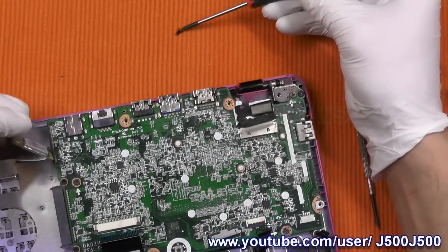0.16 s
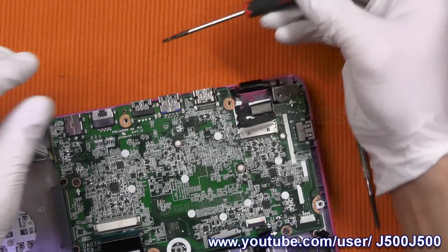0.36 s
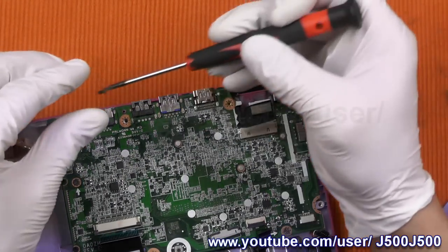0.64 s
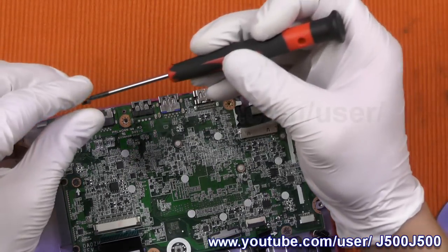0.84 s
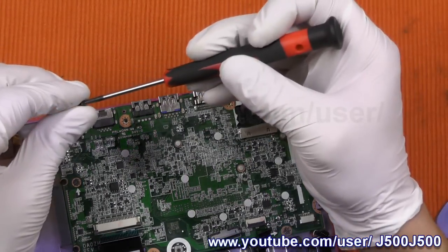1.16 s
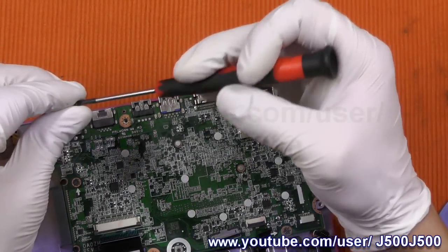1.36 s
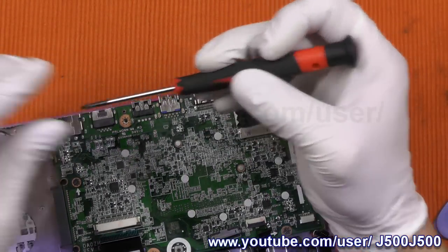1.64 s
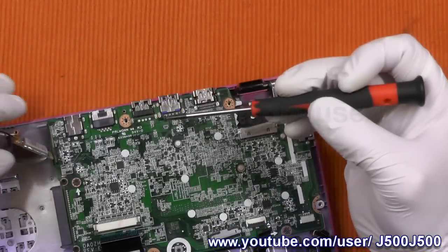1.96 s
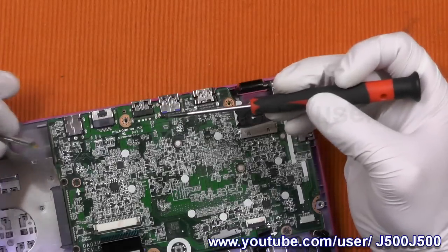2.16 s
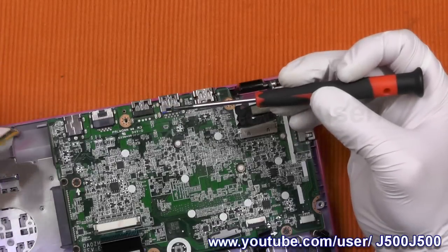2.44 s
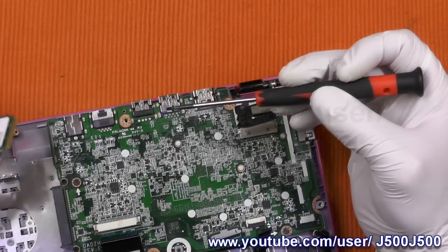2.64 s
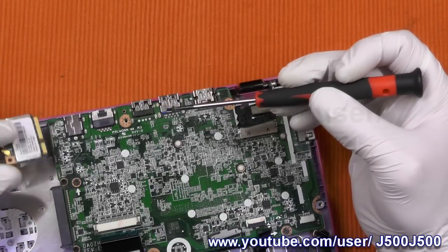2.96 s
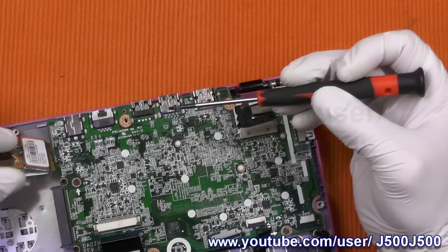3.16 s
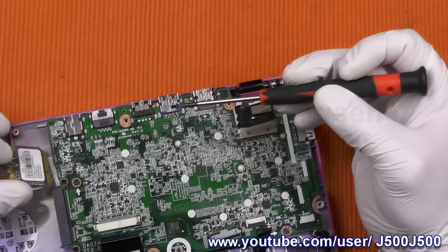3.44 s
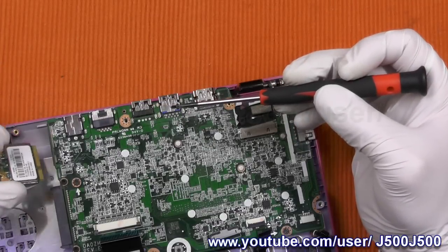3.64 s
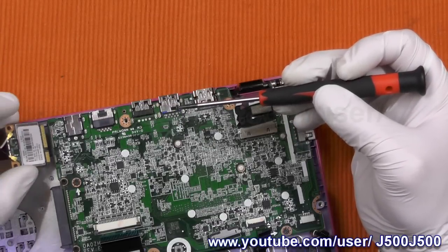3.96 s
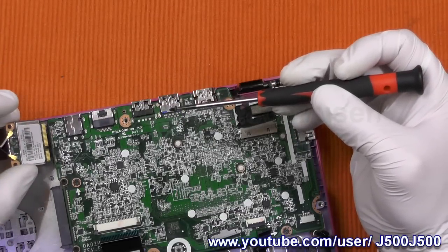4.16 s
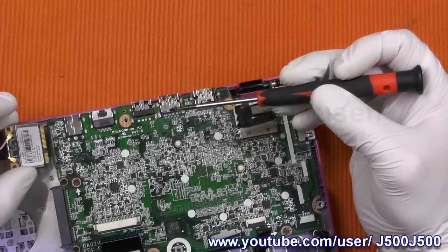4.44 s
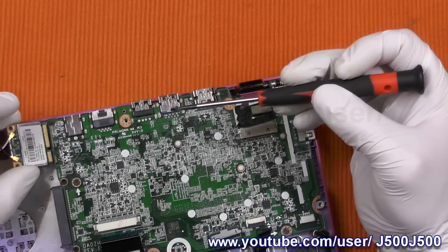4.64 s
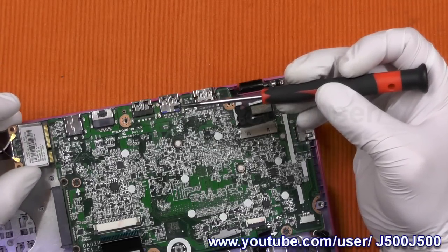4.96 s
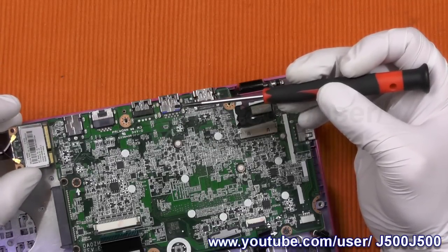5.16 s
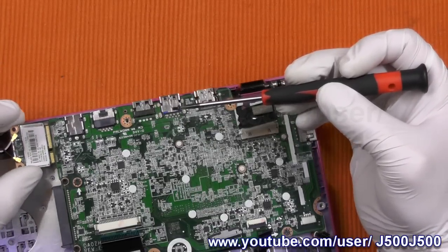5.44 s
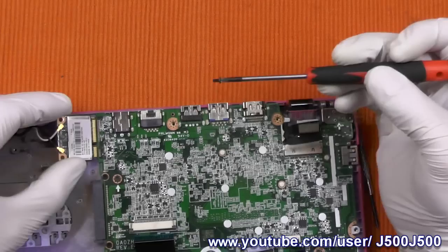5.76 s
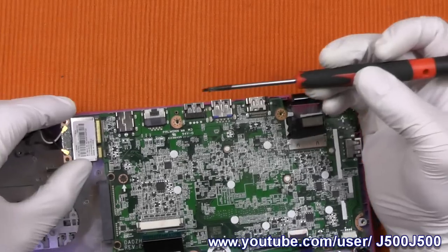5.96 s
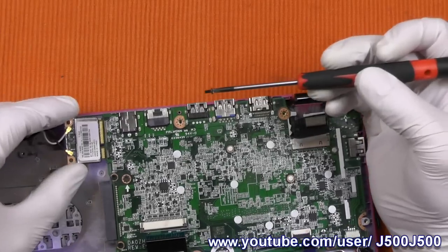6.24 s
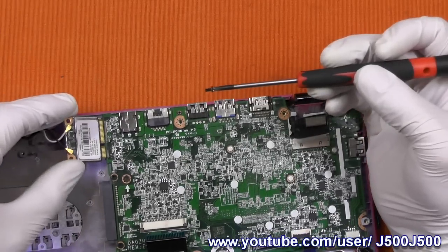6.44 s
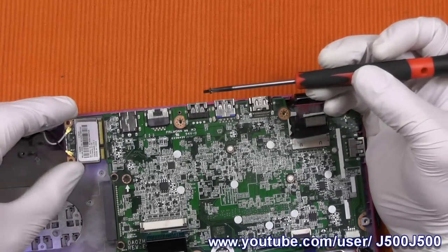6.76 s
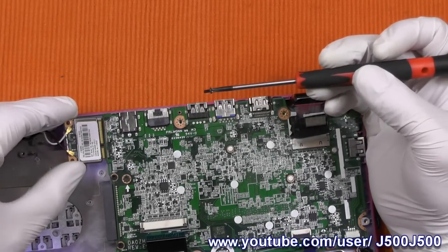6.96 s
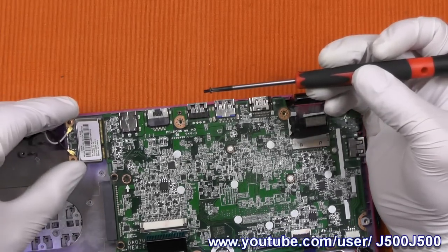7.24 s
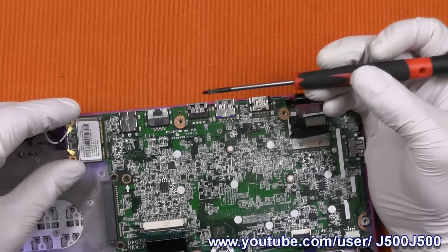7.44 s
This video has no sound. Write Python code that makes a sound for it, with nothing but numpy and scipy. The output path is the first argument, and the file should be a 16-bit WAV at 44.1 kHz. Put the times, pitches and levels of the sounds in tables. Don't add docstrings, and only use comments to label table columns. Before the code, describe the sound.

Close handling of electronics: dry clicks, thin steel ticks, soft rubs over a ribbed mat, and a loud plastic snap midway over faint hiss.

```python
import sys
import numpy as np
from scipy import signal
from scipy.fft import rfft, irfft
from scipy.io import wavfile

SR = 44100
rng = np.random.default_rng(int(sys.argv[2]) if len(sys.argv) > 2 else 0)


def undo_db(level):
    steps = np.asarray(level, float) / 20
    return 10 ** steps


def to_wav(s):
    ch = np.atleast_2d(s).T
    pcm = np.round(np.clip(ch, -1, 1) * 32767)
    wavfile.write(sys.argv[1], SR, pcm.astype(np.int16))


N = 335601


def rms_one(x):
    return x / np.sqrt(np.mean(x ** 2) + 1e-20)


def peak_one(x):
    return x / np.max(np.abs(x))


def band(x, low_hz, high_hz, order):
    return signal.sosfilt(signal.butter(order, [low_hz, high_hz], "band", fs=SR, output="sos"), x)


def on_log_pitch(hz, curve):
    curve_hz, values = np.transpose(curve)
    return np.interp(np.log(hz), np.log(curve_hz), values)


def coloured(x, spectrum):
    size = x.shape[-1]
    hz = np.fft.rfftfreq(size, 1 / SR) + 1
    return rms_one(irfft(rfft(x) * undo_db(on_log_pitch(hz, spectrum)), size))


def drift(rate_hz):
    r = np.exp(-80 * np.pi * rate_hz / SR)
    settle = 2000
    white = rng.standard_normal(N // 40 + settle + 2)
    slow = signal.lfilter([1], [1, -2 * r, r * r], white)[settle:]
    return np.interp(np.arange(N) / 40, np.arange(len(slow)), rms_one(slow))


def swells(rows, edge_db):
    out, s = np.zeros(N), np.arange(N) / SR
    for start, rise, hold, fall, db in rows:
        corners = start + np.cumsum(np.abs([0, rise, hold, fall]))
        from_ends = np.minimum(s - corners[0], corners[-1] - s)
        contact = np.clip(from_ends / .006, 0, 1)
        out += contact * undo_db(db - edge_db * np.interp(s, corners, [1, 0, 0, 1]))
    return out


def ring(clicks, hz, t60):
    r, w = undo_db(-60 / (t60 * SR)), 2 * np.pi * hz / SR
    return signal.lfilter([0, np.sin(w)], [1, -2 * r * np.cos(w), r * r], clicks + 1e-18)


# (f/Hz, likeness/1)
LIKENESS = [(30, 0.38), (90, 1), (180, 0.13), (380, 0.77), (950, 0.58), (1500, 0.995), (2400, 0.9945),
            (3500, 1)]


def stereo_white():
    hz = np.fft.rfftfreq(N, 1 / SR) + 1
    alike = np.clip(on_log_pitch(hz, LIKENESS), -1, 1)
    mid, side = rfft(rng.standard_normal((2, N)))
    return irfft(np.sqrt(1 + alike) * mid + np.sqrt(1 - alike) * side * [[1], [-1]], N)


# (t/s, level/dB at the height of the lean)
LEANS = [
    (0.0, -72.5),
    (0.68, -72.5),
    (2.138, -60.5),
    (3.4, -57.5),
    (4.2, -72),
    (5.5, -65),
    (6.21, -60),
    (6.7, -62),
    (7.25, -66),
]


def rumble():
    rest_db, rise_s, fall_s = -73, 0.29, 0.285
    lumps_db = 1.8 * drift(9)
    colour = [(15, -12.5), (40, -10.0), (70, -5.5), (100, -3.0), (140, -7.5), (220, -15.5), (400, -54.0)]
    low = coloured(stereo_white(), colour)
    leans = swells([(s - rise_s, rise_s, 0, fall_s, db) for s, db in LEANS], edge_db=18.0)
    return (undo_db(rest_db) + 0.408 * leans) * undo_db(lumps_db + 2.0) * low


# (start t/s, rise/s, hold/s, fall/s, level/dB)
BLADE_SPELLS = [
    (-0.2, 0.18, .45, .3, -80),
    (1.0, 0.28, 1.7, .45, -74),
    (5.55, .3, 1.8, .2, -72),
]
# (f/Hz, width/Hz, level/dB)
WHISTLES = [(1092.3, 100, -86), (2629, 45, -87), (3400, 110, -82.5), (3651, 120, -80), (3596, 700, -82)]


def fan():
    blade = undo_db(-90.5) + 0.64 * swells(BLADE_SPELLS, edge_db=7.0)
    white = stereo_white()

    def whistle(hz, width_hz):
        return rms_one(band(white, hz - width_hz / 2, hz + width_hz / 2, order=2))

    out = blade * whistle(1885, 75)
    out += blade * undo_db(-9) * whistle(2620, 97)
    for hz, width_hz, db in WHISTLES:
        out += undo_db(db + drift(0.5)) * whistle(hz, width_hz)
    return out


# (t/s, level/dB)
AIR = [
    (0.0, -64.5),
    (0.7, -65),
    (1.1, -69.5),
    (2.0, -64),
    (3.4, -65.5),
    (4.7, -70.5),
    (6.1, -64),
    (7.61, -68.5),
]
# (f/Hz, level/dB per Hz)
AIR_COLOUR = [(90, -41), (150, -4), (200, -5), (330, -4), (650, -7.5), (850, -16.5), (1200, -9),
              (1700, -10.5), (2300, -19), (3000, -12), (4200, -15.5), (6000, -19.5), (9000, -25),
              (12000, -56)]
# (f/Hz, level/dB per Hz)
HISS = [(4710, -22), (8000, -18.5), (8860, -8), (9630, 3.5), (11500, 2), (12500, 3.5), (15100, 2),
        (15800, -1.5)]


def air():
    air_s, level_db = np.transpose(AIR)
    air_db = np.interp(np.arange(N) / SR, air_s, level_db)
    room_air = undo_db(air_db + 2.0 + 0.54 * drift(9.6)) * coloured(stereo_white(), AIR_COLOUR)
    hiss = undo_db(-68.5) * coloured(stereo_white(), HISS)
    return room_air + fan() + hiss


# (start t/s, rise/s, hold/s, fall/s, level/dB of the rub)
STROKES = [(0.0, 0.009, 0.052, .02, -64), (0.125, 0.0318, .001, .002, -41.5),
           (0.29, 0.0706, 0.065, 0.245, -50), (1.38, 0.0081, 0.276, 0.021, -61.5),
           (1.68, 0.0407, 0.197, 0.128, -47.5), (2.24, 0.011, 0.137, 0.0098, -60.5),
           (2.75, 0.135, 0.0092, 0.078, -57.5), (3.245, .002, .01, 0.116, -48.5),
           (3.33, 0.0462, 0.011, 0.042, -54.5), (3.48, 0.0347, 0.137, 0.034, -56.5),
           (3.69, .002, .03, 0.154, -56.5), (5.32, 0.034, 0.021, 0.127, -56.5),
           (5.54, 0.0934, 0.2416, 0.0633, -45.5), (5.95, 0.0321, 0.1493, 0.0305, -48),
           (6.585, .002, .006, 0.026, -52.5), (6.64, 0.0051, 0.0052, 0.044, -47)]
# (f/Hz, level/dB per Hz)
RUB = [(1060, -36.5), (1800, -52.5), (2300, -12.5), (3310, -5.5), (5030, -6), (8590, -15.5), (9940, -15),
       (14300, -18.5), (15800, -28)]
# (f/Hz, level/dB per Hz)
SCUFF = [(500, -17.5), (800, -10.5), (1400, -6), (2000, -7), (2800, -32.5)]


def slides():
    unevenness_db = 4.0 * rng.standard_normal((2, N)) + 1.2 * drift(79)
    grains = rng.standard_normal((2, N)) * undo_db(unevenness_db)
    rub, scuff = coloured(grains[0], RUB), coloured(grains[1], SCUFF)
    return swells(STROKES, edge_db=17.5) * undo_db(-6.5) * (rub + undo_db(-9.5) * scuff)


# (f/Hz, level/dB, t60/s)
CASE = [(285, -9, .045), (480, -26, .025), (690, 0, .03), (940, -4, .025), (1090, -6, .025),
        (1290, -3, .025)]


def case_rung(contacts, luck_db):
    boom = sum(undo_db(g + r) * ring(contacts, hz, t60) for (hz, g, t60), r in zip(CASE, luck_db))
    return band(boom, 198, 1620, order=2)


def modes_rung(contacts, modes, hz, focus_db, luck_db):
    body = 0
    for (mode_hz, width_hz, g), r in zip(modes, luck_db):
        far_db = focus_db * np.log2(mode_hz / hz) ** 2
        height = undo_db(g + r - far_db) * width_hz
        body = body + height * ring(contacts, mode_hz, .85 / width_hz)
    spot = undo_db(36.5) * ring(contacts, hz, 40.2 / hz)
    return band(body + spot, 1350, 15000, order=3)


def taps(events, modes, boom_db, boom_loss, crack_db, crack_loss, focus_db, crack_low_hz, crack_top_hz, floor=0):
    light_tap_db = -45
    out, size = np.zeros(N + SR), SR // 5
    t = np.arange(size) / SR
    for s, db, hz, t60 in events:
        stronger_db = db - light_tap_db
        build_up = (1 - np.exp(-t / (.09 * t60))) ** 2
        shape = undo_db(-60 * t / t60) * build_up
        contacts = shape * rng.standard_normal(size) * undo_db(5.76 * rng.standard_normal(size))
        luck_db = rng.normal(0, 3, len(modes) + len(CASE))
        tick = modes_rung(contacts, modes, hz, focus_db, luck_db)
        if floor:
            tick = band(tick, floor * hz, 18000, order=2)
        crack = band(contacts * undo_db(-30 * t / t60), crack_low_hz, crack_top_hz, order=2)
        boom = case_rung(contacts, luck_db[::-1])
        layers = peak_one(tick)
        layers = layers + undo_db(crack_db - crack_loss * stronger_db) * peak_one(crack)
        layers = layers + undo_db(boom_db - boom_loss * stronger_db) * peak_one(boom)
        at = round((s - .05 * t60) * SR)
        out[at:at + size] += undo_db(db) * layers
    return out[:N]


# (t/s, peak level/dB, brightest f/Hz, rattle t60/s)
BOARD_TAPS = [(0.092, -43, 4020, 0.06), (1.3452, -46, 1670, 0.0244), (2.612, -34, 1477, 0.01577),
              (3.4688, -33.5, 3160, 0.015), (3.5118, -42.5, 3010, 0.0454), (3.5752, -44.5, 2950, 0.044),
              (3.611, -49.5, 3840, 0.04), (3.859, -52.5, 2670, 0.048), (3.8988, -55, 2730, 0.0206),
              (5.3366, -64.5, 5225, 0.066), (5.445, -48.5, 4320, 0.0222), (5.484, -51, 1450, 0.0175),
              (6.7855, -52.5, 3480, 0.055), (7.0658, -52.5, 3100, 0.029), (7.379, -50.5, 4000, 0.051),
              (7.595, -44.5, 4660, 0.0435)]
# (f/Hz, width/Hz, level/dB)
BOARD = [(1535, 60, -1), (1660, 50, -5), (1765, 50, -4), (2370, 45, -6), (2560, 75, -3), (3055, 60, 1),
         (3350, 70, -3), (3700, 70, -7), (3935, 80, -3), (4300, 70, -6), (4610, 50, 0), (4930, 65, -4),
         (5600, 110, -11), (6100, 90, -11), (6740, 60, -7), (7200, 70, -7), (7540, 60, -3), (8100, 60, -9)]


def board_taps():
    return taps(BOARD_TAPS, BOARD, boom_db=-40, boom_loss=-1.5, crack_db=-4.5, crack_loss=0.5,
                focus_db=0.0, crack_low_hz=7100, crack_top_hz=13450)


# (t/s, peak level/dB, f/Hz, chatter/s)
PINGS = [(0.094, -48.5, 3003, 0.0113), (0.134, -50, 3000, 0.017), (0.1525, -26, 4072, 0.00465),
         (0.198, -49, 714, 0.0122), (3.417, -44, 1408, 0.0091), (3.439, -45, 3060, 0.0118),
         (3.4697, -38.5, 2956, 0.00445), (3.469, -40, 4100, 0.0045), (3.51, -47, 4110, 0.0154),
         (3.512, -48, 3000, .03), (3.576, -47.5, 2980, 0.0092), (3.578, -50.5, 6500, .012),
         (3.612, -54, 3850, 0.0142), (6.586, -49.5, 3010, 0.025), (6.589, -54, 4570, 0.0257),
         (6.645, -44, 2910, 0.0056), (6.652, -53.5, 4590, 0.021), (6.655, -49, 2970, 0.0264),
         (0.53, -52, 288.8, 0.0084), (2.0974, -52.5, 4300, 0.0058), (2.202, -50, 3000, 0.0081),
         (2.205, -46.5, 10400, .008), (2.2895, -40, 7300, 0.00347), (2.2895, -46.5, 9500, 0.0031),
         (2.326, -47.5, 5600, .006), (2.339, -45, 5500, 0.0053), (2.371, -50, 5020, 0.0125),
         (2.389, -48, 5210, 0.0032), (2.395, -51, 5700, .008), (6.02, -44, 3000, 0.0058),
         (6.0753, -39, 4180, 0.0046), (6.075, -48, 1510, 0.0045), (6.123, -45.5, 1520, 0.00985),
         (6.275, -37.5, 6880, 0.0063), (6.274, -34.5, 4600, 0.0062), (3.226, -21, 1610, 0.00485),
         (3.226, -24, 6060, 0.0055), (3.256, -46, 3100, 0.0072), (3.284, -38, 782, 0.0098),
         (3.301, -49.5, 6600, 0.0039), (2.6134, -32, 5990, 0.007), (2.623, -40, 6230, 0.0083),
         (2.6135, -32.5, 12660, 0.0041), (2.582, -53.5, 3700, 0.00335), (3.73, -28.5, 6950, 0.0032),
         (3.6796, -30, 4390, 0.0034), (3.677, -22.5, 8210, 0.003), (3.686, -45.5, 4390, 0.0165),
         (3.729, -37, 3450, 0.0103), (0.2207, -47.5, 8640, 0.0039)]


def pings():
    out, size = np.zeros(N + SR), SR // 10
    t = np.arange(size) / SR
    for s, db, hz, chatter_s in PINGS:
        burst = np.sin(np.pi * np.clip(t / chatter_s, 0, 1)) ** .5
        contacts = rng.standard_normal(size) * burst
        at = round(s * SR)
        out[at:at + size] += undo_db(db) * peak_one(ring(contacts, hz, 34.6 / hz))
    return out[:N]


# (t/s, peak level/dB)
THUDS = [(0.147, -45.5), (0.522, -39), (1.743, -48), (2.168, -44.5), (2.62, -56.5), (2.97, -60.5),
         (3.23, -36.5), (4.13, -58.5), (4.92, -56), (5.021, -57), (5.279, -56), (5.365, -53), (6.021, -59),
         (6.175, -43.5), (6.654, -53), (6.819, -56), (6.868, -46.5), (7.063, -47.5), (7.291, -53.5)]
# (f/Hz, level/dB, t60/s)
TABLE = [(62, -19.5, 0.18), (93.63, -4, 0.306), (133.54, 0.5, 0.1), (200, -9, 0.11)]


def thuds():
    s, db = np.transpose(THUDS)
    out, at = np.zeros(N), (s * SR).round().astype(int)
    for hz, level_db, t60 in TABLE:
        pushes = np.zeros(N)
        luck_db = rng.normal(0, 2, len(at))
        pushes[at] = undo_db(db + level_db + 3.0 + luck_db)
        out += ring(pushes, hz, t60)
    push = np.hanning(round(0.00729 * SR))
    return band(np.convolve(out, push / push.sum())[:N], 68, 390, order=2)


# (t/s, peak level/dB)
HARD_BLOWS = [(3.2205, -18.5), (3.2255, -12.5), (3.2266, -7), (3.228, -14.5), (3.2302, -16), (3.2335, -16),
              (3.238, -19.5), (3.2405, -16.5), (3.243, -26), (0.1515, -24), (0.1536, -31), (0.156, -28),
              (0.1605, -34), (0.167, -37)]
# (f/Hz, width/Hz, level/dB)
SOCKET = [(702.6, 26.9, -4), (1306, 120, -1.5), (2589, 32.1, -2), (3051, 70, 0), (3317, 28, -5),
          (3913, 23, -5.5), (4600, 38, -8.5), (4985, 36, -5.5), (5700, 110, -8.5), (6500, 39, -4.5),
          (7528, 52, -2), (9270, 29, -16), (9380, 110, -15), (10400, 38, -21)]


def hard_blows():
    s, db = np.transpose(HARD_BLOWS)
    out, at = np.zeros(N), (s * SR).round().astype(int)
    luck_db = rng.normal(0, 2, (len(s), len(SOCKET)))
    for k, (hz, width_hz, level_db) in enumerate(SOCKET):
        blows = np.zeros(N)
        blows[at] = undo_db(db + level_db - 9.5 + luck_db[:, k]) * (-1) ** k
        out += ring(blows, hz, .55 / width_hz)
    t = np.arange(SR // 100) / SR
    for i, level_db in zip(at, db):
        noise = rng.standard_normal(len(t)) * undo_db(-60 * t / .004)
        crack = band(noise, 1000, 13000, order=1)
        out[i:i + len(t)] += undo_db(level_db - 3) * peak_one(crack)
    return out


# (t/s, peak level/dB, brightest f/Hz, rattle t60/s)
CASE_TAPS = [(0.152, -24, 1397, 0.0308), (0.1647, -41.5, 1630, 0.0283), (0.1944, -49, 1360, 0.061),
             (2.094, -45, 4080, 0.047), (2.1078, -46, 1560, 0.0393), (2.1639, -35.5, 1657, 0.0616),
             (2.2029, -43.5, 4520, 0.0804), (3.2834, -36, 1520, 0.0264), (3.34, -53, 1430, 0.046),
             (3.9427, -56.5, 4200, 0.04), (4.0202, -54.5, 1650, 0.029), (4.074, -51.5, 1300, 0.065),
             (5.0187, -42, 4370, 0.0403), (5.0693, -58.5, 1510, 0.039), (5.113, -57.5, 1510, 0.0166),
             (5.3648, -66.5, 3700, 0.03), (6.0196, -46.5, 3530, 0.059), (6.0755, -43, 1553, 0.034),
             (6.1283, -44, 1480, 0.076), (6.272, -28.5, 3486, 0.0501), (6.287, -41.5, 3120, 0.0393),
             (6.5863, -46.5, 3080, 0.097), (6.6474, -43, 2920, 0.0237), (6.655, -39, 1589, 0.0584),
             (6.9916, -51, 3000, 0.0396)]


def case_taps():
    return taps(CASE_TAPS, BOARD, boom_db=-4.5, boom_loss=0.25, crack_db=-22.5, crack_loss=1.44,
                focus_db=3.0, crack_low_hz=5560, crack_top_hz=13100)


# (t/s, peak level/dB, f/Hz)
KNOCKS = [
    (0.153, -36, 717),
    (0.156, -33, 281),
    (0.197, -54.5, 652),
    (2.169, -43, 303),
    (2.515, -59, 625),
    (3.229, -32, 290.8),
    (5.024, -54.5, 290),
    (5.093, -51, 607),
    (6.309, -49, 637),
    (6.589, -47.5, 276),
]


def knocks():
    out = np.zeros(N)
    for s, db, hz in KNOCKS:
        push = np.zeros(N)
        push[round(s * SR)] = undo_db(db + 1.5)
        out += ring(push, hz, 0.0394) + undo_db(-8.5) * ring(push, 0.793 * hz, 0.037)
    return band(out, 200, 1000, order=1)


# (t/s, peak level/dB, brightest f/Hz, rattle t60/s)
TICKS = [(0.22, -39.5, 8600, 0.0275), (0.2216, -38.5, 4710, 0.0222), (0.37, -44, 5600, 0.041),
         (1.0964, -56, 3240, 0.026), (1.4779, -39, 6340, 0.021), (1.6185, -54.5, 4190, 0.061),
         (2.264, -45, 4930, 0.078), (2.29, -42, 7360, 0.05), (2.3154, -46, 6700, 0.059),
         (2.3394, -45.5, 5560, 0.079), (2.3873, -46, 5470, 0.068), (2.6119, -25.5, 4600, 0.0411),
         (2.8692, -54.5, 3400, 0.029), (2.9693, -44.5, 5130, 0.053), (6.273, -37, 5600, 0.049),
         (3.1212, -48.5, 6900, 0.04), (3.149, -55, 3320, 0.041), (3.6745, -25, 4460, 0.048),
         (3.6765, -30, 1984, 0.0156), (3.676, -17, 8000, 0.02), (3.7285, -28, 6450, 0.0292),
         (3.7322, -30.5, 3660, 0.037)]
# (f/Hz, width/Hz, level/dB)
STEEL = [(1700, 150, -12), (2050, 180, -9), (2800, 90, -14), (3800, 120, -6), (4290, 70, 2), (4610, 70, 2),
         (5300, 150, -6), (6130, 160, -4), (6550, 130, -4), (6860, 100, -3), (7420, 110, -6),
         (8200, 330, -2), (8890, 120, -7), (9460, 80, 0), (10300, 160, -5), (10700, 170, -8)]


def steel_ticks():
    return taps(TICKS, STEEL, boom_db=-31, boom_loss=2, crack_db=-2.5, crack_loss=0.41,
                focus_db=17.0, crack_low_hz=9490, crack_top_hz=16600, floor=1)


# (t/s, peak level/dB, brightest f/Hz, rattle t60/s)
SNAP = [
    (3.2195, -18.5, 1400, 0.045),
    (3.2255, -14, 3130, 0.03),
    (3.2365, -21.5, 2590, 0.03),
]


def snap():
    return taps(SNAP, BOARD, boom_db=1.4, boom_loss=0.66, crack_db=1.4, crack_loss=0.17,
                focus_db=1.5, crack_low_hz=5600, crack_top_hz=16040)


# (start t/s, rise/s, hold/s, fall/s, level/dB)
DRAG = [
    (3.411, 0.0044, 0.031, 0.048, -44.5),
    (3.5, 0.0326, 0.0253, 0.034, -59),
]


def drag():
    struck = rng.random(N) < 7000 / SR
    contacts = struck * rng.standard_normal(N) * undo_db(.3 * drift(70))
    board = rms_one(modes_rung(contacts, BOARD, 2870, 0.69, np.zeros(len(BOARD))))
    case = rms_one(band(case_rung(contacts, np.zeros(len(CASE))), 757, 1340, order=1))
    hiss = rms_one(band(contacts, 12000, 15500, order=1))
    return swells(DRAG, edge_db=26) * (board + undo_db(-4.5) * case + undo_db(-19) * hiss)


def near_echoes(hits, side_db):
    t = np.arange(SR // 100) / SR
    echo = rng.standard_normal(len(t)) * undo_db(-60 * t / 0.01)
    side = signal.fftconvolve(hits, echo / np.sqrt(np.sum(echo ** 2)))[:N]
    return undo_db(side_db) * band(side, 900, 16000, order=1) * [[1], [-1]]


def room(x):
    t60_s, tail_db = 0.149, -18
    t = np.arange(SR // 2) / SR
    tail = rng.standard_normal(len(t)) * undo_db(-60 * t / t60_s) * (t > .006)
    tail = signal.lfilter([1], [1, -.6], tail)
    answer = undo_db(tail_db) * tail / np.sqrt(np.sum(tail ** 2))
    answer[0] = 1
    return signal.fftconvolve(x, answer)[:N]


def scene():
    background = rumble() + air()
    handling = slides() + thuds() + knocks() + drag()
    hits = board_taps() + case_taps() + steel_ticks() + snap()
    blows = hard_blows()
    sideways = near_echoes(hits, side_db=-23.0) + near_echoes(blows, side_db=-12)
    return room(hits + blows + pings() + handling) + sideways + background


def band_limit(x):
    return signal.sosfilt(signal.butter(12, 16650, fs=SR, output="sos"), x)


# (f/Hz, level/dB)
PORTS = [(100, -24), (1500, -17), (2200, -28), (6700, -32), (7000, -10), (9000, -10), (9300, -40),
         (16000, -40)]


def record(dry):
    t = np.arange(SR // 50) / SR
    scatter = rng.standard_normal(len(t)) * undo_db(-60 * t / .03)
    scatter = scatter / np.sqrt(np.sum(scatter ** 2))
    hz = np.fft.rfftfreq(N, 1 / SR) + 1
    share = undo_db(on_log_pitch(hz, PORTS))
    side = irfft(rfft(dry.mean(axis=0)) * rfft(scatter, N) * share, N)
    balance_db = -0.0268 * np.array([[.5], [-.5]])
    ports = (dry + side * [[1], [-1]]) * undo_db(balance_db)
    cut = signal.sosfilt(signal.cheby2(12, 70, 17000, fs=SR, output="sos"), ports)
    return band_limit(cut)


dry = scene()
out = record(dry)
to_wav(out)
```